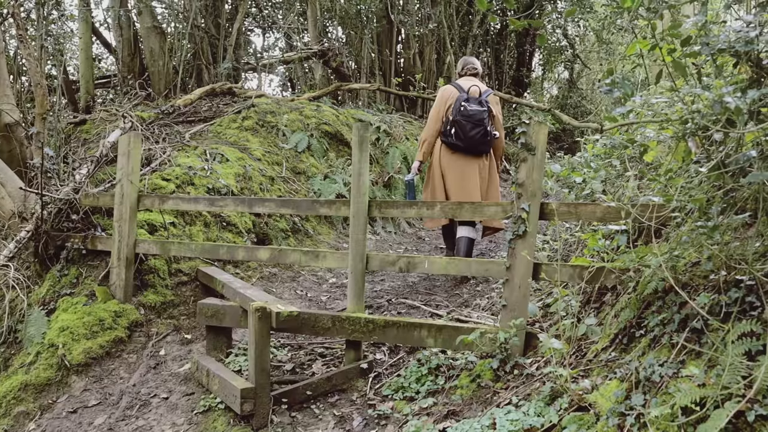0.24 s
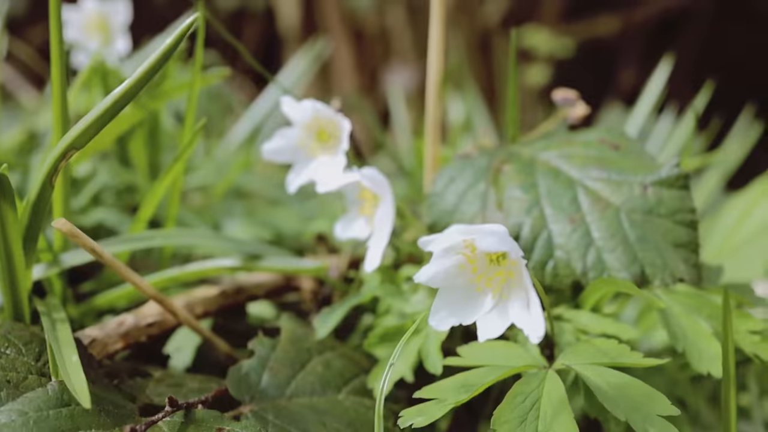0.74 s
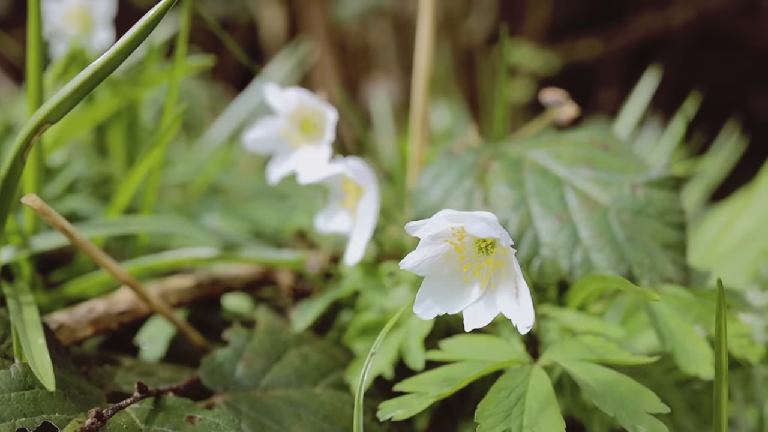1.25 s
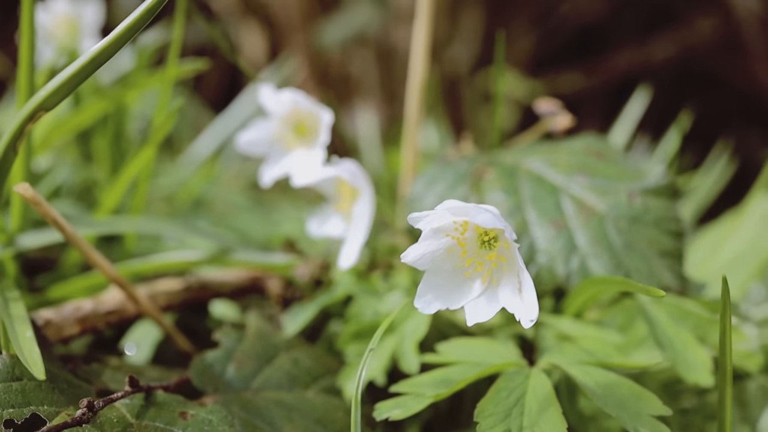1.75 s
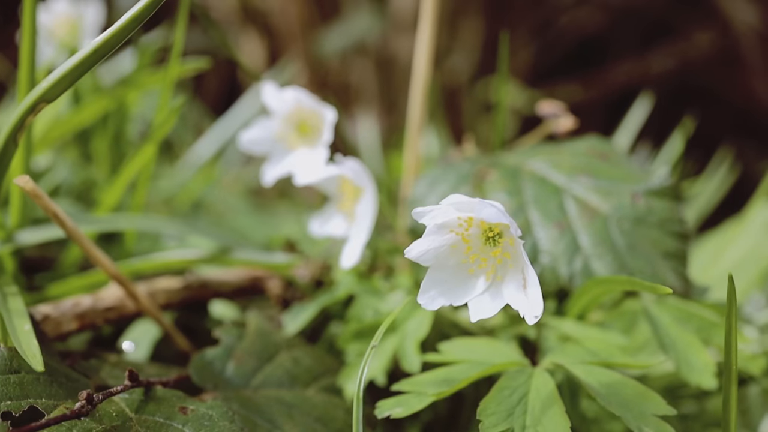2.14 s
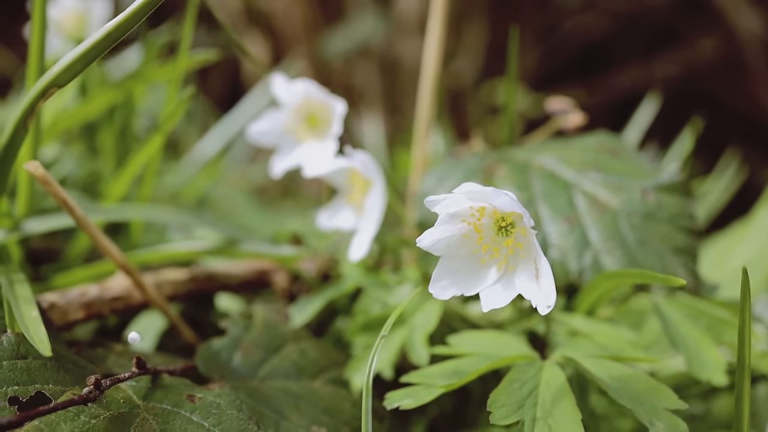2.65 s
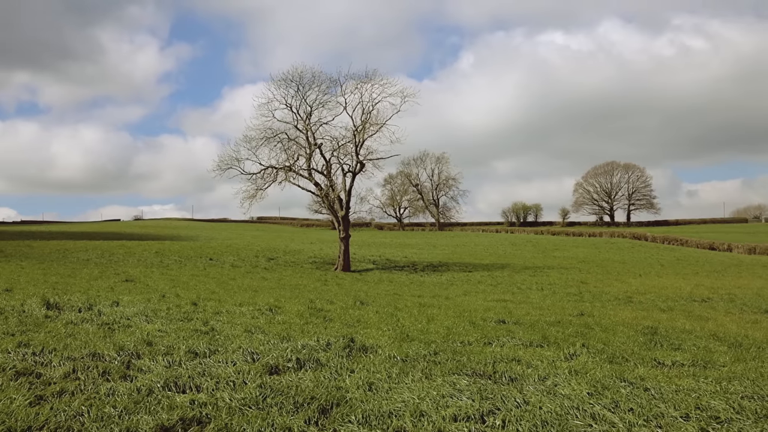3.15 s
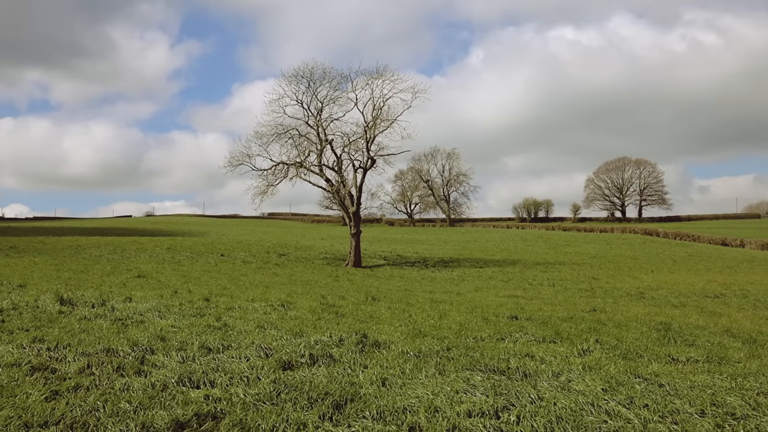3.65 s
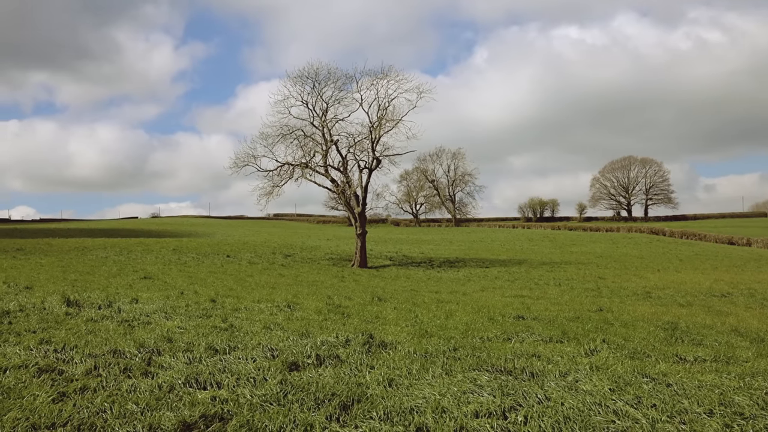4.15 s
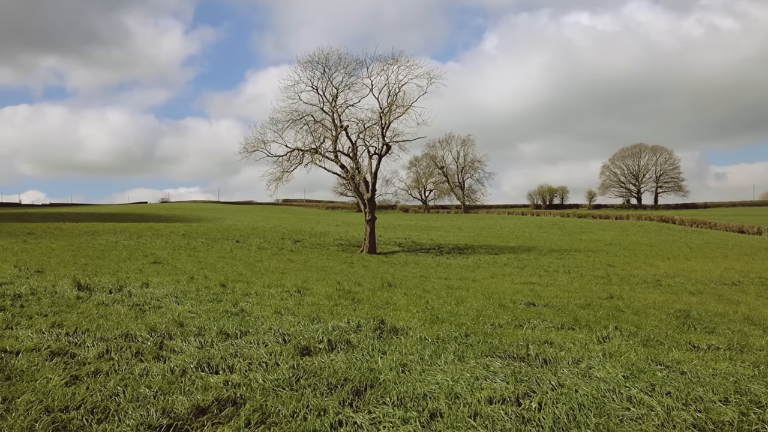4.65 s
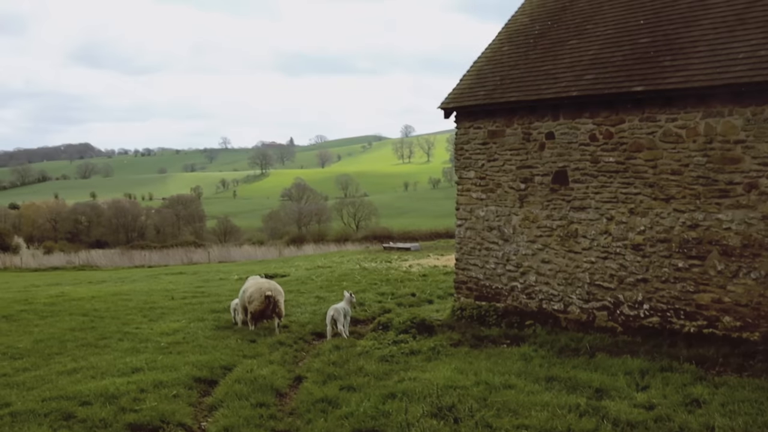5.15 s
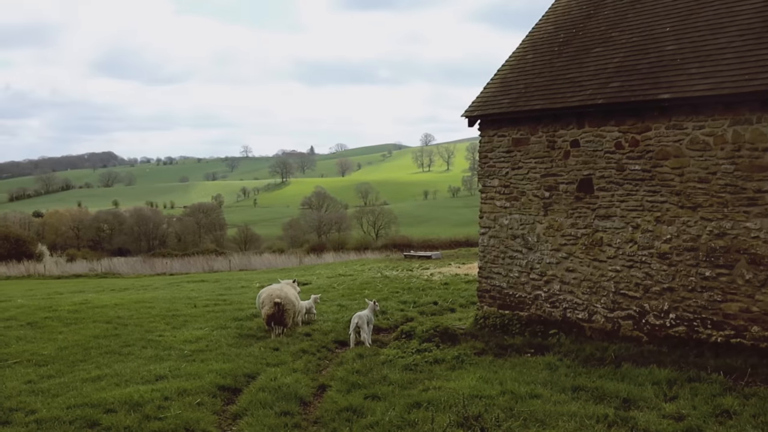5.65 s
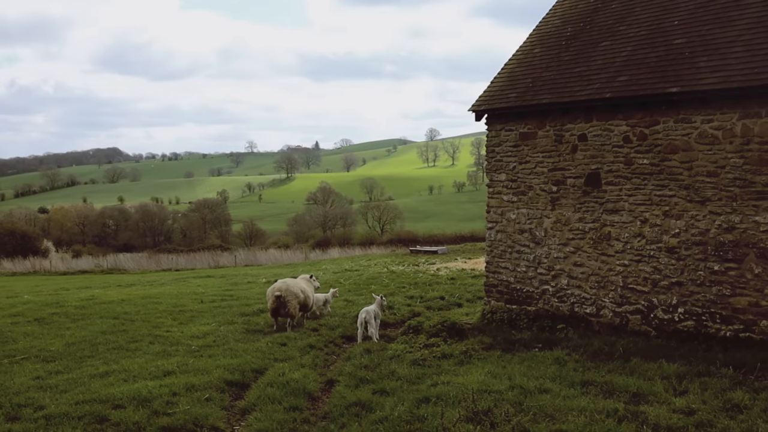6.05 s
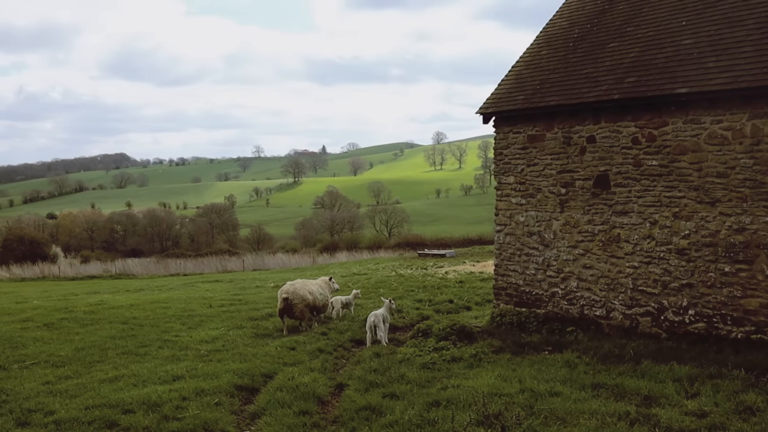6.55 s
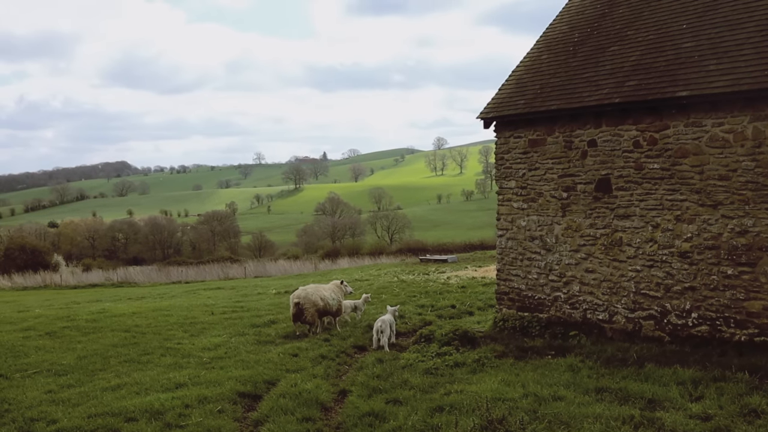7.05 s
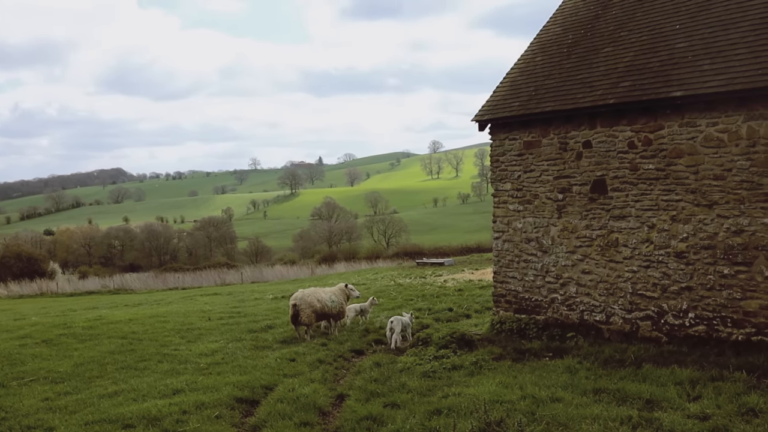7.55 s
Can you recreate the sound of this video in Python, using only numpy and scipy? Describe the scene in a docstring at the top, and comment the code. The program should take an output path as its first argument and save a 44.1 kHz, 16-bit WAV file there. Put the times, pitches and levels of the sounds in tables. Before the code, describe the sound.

A bird whistles over a gritty footstep, leaves rustle and a bird buzzes, wind crosses a field, then a lamb bleats twice around a ewe's low rumble.

```python
"""A small bird whistles and trills over footsteps on a path, the start of a country walk in four places.
Then leaves rustle in a wood, where a bird buzzes; wind crosses a field; at a barn a lamb bleats twice
and a ewe rumbles low in between. Air, leaves and steps are filtered noise, birds are gliding sines,
and the animals are pulses and breath from vocal folds, passed through the resonances of mouth and nose."""
import sys
import numpy as np
from scipy import signal
from scipy.fft import rfft, irfft, next_fast_len
from scipy.io import wavfile
from scipy.ndimage import uniform_filter1d

SR = 44100
rng = np.random.default_rng(int(sys.argv[2]) if len(sys.argv) > 2 else 0)


def persist_wave(psi):
    """Save psi, clipped to +-1, as 16-bit WAV."""
    counts = np.round(np.clip(psi, -1, 1) * 32767).astype(np.int16)
    wavfile.write(sys.argv[1], SR, np.atleast_2d(counts).T)


N = 344421
TIME = np.arange(N) / SR
BINS = np.fft.rfftfreq(4096, 1 / SR)


def amp(db):
    """Decibel law: converts a level to an amplitude gain."""
    return 10 ** (np.asarray(db) / 20)


def unit(x):
    """Normalization: scales a signal to rms 1."""
    return x / np.sqrt(np.mean(x ** 2) + 1e-20)


def curve(rows, t, column=1):
    """Linear interpolation: joins one column of a table by straight lines in time."""
    rows = np.asarray(rows)
    return np.interp(t, rows[:, 0], rows[:, column])


def shape(points, hz):
    """Spectral envelope: gain interpolated in dB along a log-frequency axis."""
    point_hz, db = np.transpose(points)
    return amp(np.interp(np.log(hz + 1), np.log(point_hz + 1), db))


def add(mix, s, sound):
    """Superposition: adds a sound at time s, or at 0 if s is negative."""
    part = mix[max(round(s * SR), 0):][:len(sound)]
    part += sound[:len(part)]


def wander(size, hz):
    """Low-passed random fluctuation of rms 1, up to about hz changes a second."""
    padded = next_fast_len(size)
    f = np.fft.rfftfreq(padded, 1 / SR)
    spectrum = rfft(rng.standard_normal(padded)) / (1 + (f / hz) ** 4)
    return unit(irfft(spectrum, padded)[:size])


def noise(points, patchy_db=1.0, flicker_db=2.3):
    """Subtractive noise: a random spectrum with drifting patches and a flicker shared by all bands."""
    hz = np.fft.rfftfreq(2048, 1 / SR)
    real, imaginary, patches = rng.standard_normal((3, N // 512 + 5, len(hz)))
    patches = uniform_filter1d(patches, size=6, axis=0)  # smooth in time
    patches = unit(uniform_filter1d(patches, size=16, axis=1))  # smooth in frequency
    flicker = rng.standard_normal((len(real), 1))
    level = amp(patchy_db * patches + flicker_db * flicker)
    frames = (real + 1j * imaginary) * shape(points, hz) * level
    return unit(signal.istft(frames.T, nperseg=2048, noverlap=1536)[1][:N])


def tract(x, modes):
    """Minimum-phase resonance: each pulse rings through the modes and dies away after it strikes."""
    gain = sum(amp(db) / (1 + (2 * (BINS - hz) / width) ** 2) for hz, width, db in modes)
    log_gain = np.log(gain + 1e-6)
    circle = np.concatenate([log_gain, log_gain[-2:0:-1]])
    # the Hilbert transform of the log gain supplies the phase of a causal response
    ring = np.fft.ifft(np.exp(np.conj(signal.hilbert(circle)))).real
    return signal.fftconvolve(x, ring)[:len(x)]


def steady(x):
    """Automatic gain: holds a voice near rms 1 over a few cycles."""
    window = signal.windows.hann(600)
    power = np.convolve(x ** 2, window / window.sum(), "same")
    return x / np.sqrt(power + 1e-12)


def echoes(x, t60, wet_db):
    """Reverberation: adds sparse random reflections that decay by 60 dB in t60 seconds."""
    t = np.arange(SR) / SR
    sparse = rng.standard_normal(SR) * (rng.random(SR) < .05)
    taps = sparse * (t > .004) * amp(-60 * t / t60)
    return x + amp(wet_db) * signal.fftconvolve(x, taps / np.linalg.norm(taps))[:N]


# gusts stir the leaves and push on the microphone:
# crest_s, half_length_s, rustle_rise_db, wind_rise_db
GUST_ROWS = [(0.773, 0.12, 1.5, -1), (1.427, 0.048, 0.5, 2), (2.6, 0.17, 1, -5), (3.36, 0.22, 2.5, 1),
             (4.416, 0.22, 4, 3), (4.744, 0.1, 1.5, 8), (4.93, 0.1, 2, 11), (5.294, 0.18, 3.5, 6)]


def gusts():
    """Gaussian envelopes: changes in the level of rustle and wind, in dB."""
    return sum(np.outer(rise_db, np.exp(-((TIME - s) / half) ** 2)) for s, half, *rise_db in GUST_ROWS)


# spectrum of the slow sway of pressure: frequency_hz, level_db
SWAY_SPECTRUM = [(8, -34), (20, 0), (26, 3), (34, -17), (60, -32), (150, -56.5)]
# spectrum of the wind's buffeting: frequency_hz, level_db
BUFFET_SPECTRUM = [(25, -18), (40, -13), (54, 4), (90, 3.5), (150, -7.5), (220, -34.5), (600, -65)]


def wind(sway_db, buffet_db):
    """Turbulent pressure: lumpy low-frequency noise on the microphone."""
    sway = noise(SWAY_SPECTRUM, flicker_db=2.5) * amp(sway_db)
    return sway + noise(BUFFET_SPECTRUM, flicker_db=0.5) * amp(buffet_db)


# course of one gust in the grass: time_s, level_db
GRASS_GUST = [(4.2, -79), (4.38, -53.5), (4.48, -43.5), (4.58, -48), (4.7, -48.5), (4.76, -75)]
# spectrum of the hissing grass: frequency_hz, level_db
GRASS_SPECTRUM = [(1500, -1.5), (3000, -0.5), (6000, -4.5), (8500, -2), (15500, -11.5)]


def grass():
    """Broadband friction noise: one gust hisses across the field."""
    return noise(GRASS_SPECTRUM, patchy_db=2.5, flicker_db=2.5) * amp(curve(GRASS_GUST, TIME))


# dull thuds: crest_s, level_db, centre_hz
THUD_ROWS = [(1.515, -39, 76), (5.3, -47, 178), (5.589, -42.5, 176), (6.41, -48, 178), (6.47, -48, 178),
             (6.73, -52, 178), (6.919, -44.5, 191), (6.971, -53, 180)]


def thuds():
    """Heavily damped resonance: soft low bumps of narrow noise under a Gaussian envelope."""
    out, t = np.zeros(N), np.arange(-.1, .1, 1 / SR)
    for s, db, hz in THUD_ROWS:
        body = unit(tract(rng.standard_normal(len(t)), [(hz, 0.45 * hz, 0)]))
        add(out, s + t[0], amp(db) * np.exp(-(t / 0.021) ** 2) * body)
    return out


# twigs tick: start_s, level_db (each peaks at 2.96 times this amplitude), centre_hz
TWIG_TICKS = [(0.032, -35, 3760), (.887, -50, 9000), (1.481, -34.5, 5900), (1.647, -49, 9000),
              (1.782, -42.5, 7000), (1.881, -44, 6800), (1.949, -49, 9000)]


def twigs():
    """Impulsive excitation: dry snaps of noise a few milliseconds long, each in one broad resonance."""
    out, t = np.zeros(N), np.arange(2048) / SR
    for s, db, hz in TWIG_TICKS:
        snap = tract(rng.standard_normal(len(t)) * np.exp(-t / 0.0019), [(hz, hz * 1.0, 0)])
        add(out, s, amp(db) * 2.96 * snap / abs(snap).max())
    return out


def whistle(length, pitches, db):
    """Frequency modulation: a near sine glides smoothly through two or three pitches."""
    u = np.linspace(0, 1, int(length * SR))
    glide = np.polyfit(np.linspace(0, 1, len(pitches)), pitches, len(pitches) - 1)
    hz = np.polyval(glide, u) * (1 + 0.008 * wander(len(u), 250))
    tone = np.sqrt(2) * np.sin(2 * np.pi * np.cumsum(hz) / SR)
    return amp(db) * signal.windows.tukey(len(u), .7) * tone


# far birds chirp: start_s, start_hz, end_hz, level_db
FAR_CHIRPS = [(4.287, 6300, 4800, -61), (4.348, 5340, 4400, -53), (6.229, 4120, 5000, -57),
              (6.378, 3690, 4300, -56.5), (6.517, 4120, 4850, -59), (6.692, 3800, 4180, -59)]
CHIRP_S = 0.029
RUN_START_S, RUN_PERIOD_S = 6.911, .0495  # one of them runs off four falling notes


def far_birds(count=4):
    """Gliding tones with reverberation: faint single chirps and one even run of falling notes."""
    out = np.zeros(N)
    for s, *pitches, db in FAR_CHIRPS:
        add(out, s, whistle(CHIRP_S, pitches, db))
    for k in range(count):
        add(out, RUN_START_S + k * RUN_PERIOD_S, whistle(CHIRP_S, (3750, 2700), -57))
    return echoes(out, t60=.5, wet_db=-7)


BUZZ_START_S, BUZZ_DB, BUZZ_SWELL_DB_PER_S = 2.566, -55.5, 70
BUZZ_SURGE_HZ, BUZZ_SURGE_DB = 17.5, 3  # the level surges as it swells


def buzz():
    """Fast frequency modulation: a bird's swelling whistle flutters at 130 Hz, so that it buzzes."""
    hz = 4020 + 140 * np.sin(2 * np.pi * 130 * TIME) + 65 * wander(N, 200)
    age = np.clip(TIME, BUZZ_START_S, PLACE_EDGES[2]) - BUZZ_START_S
    surge = BUZZ_SURGE_DB * np.sin(2 * np.pi * BUZZ_SURGE_HZ * age)
    db = BUZZ_DB + BUZZ_SWELL_DB_PER_S * age + surge
    note = np.sqrt(2) * np.sin(2 * np.pi * np.cumsum(hz) / SR) * amp(db) * (age > 0)
    return echoes(note, t60=0.3, wet_db=-2.5)


# a boot presses grit and leaves: start_s, level_db (before a common lift of 1 dB), fading_time_s
STEP_PRESSES = [(0.353, -33.5, 0.014), (0.37, -33.5, 0.01), (0.384, -48.5, 0.072), (0.454, -39, 0.022),
                (0.467, -36, 0.013), (0.474, -31.5, 0.0084), (.494, -42, 0.059), (0.519, -40, 0.0057)]
# spectrum of the crushed grit: frequency_hz, level_db
GRIT_SPECTRUM = [(35, -35), (60, 4.5), (792, -4.5), (1260, -10), (2910, -3.5), (3930, -3), (4630, -9),
                 (5450, -8), (8280, -12), (9510, -9.5), (15500, -20)]


def footsteps():
    """Granular excitation: each press crushes a burst of small grains, a few of them much larger."""
    press = np.zeros(N)
    for s, db, fade in STEP_PRESSES:
        age = np.maximum(TIME - s, 0)
        press += amp(db) * (1 - np.exp(-age / 0.0008)) * np.exp(-age / fade)
    grains = amp(5 * np.minimum(wander(N, 500), 2.2))
    return press * unit(noise(GRIT_SPECTRUM) * grains) * amp(1)


# the near bird's opening slurs: start_s, length_s, start_hz, middle_hz, end_hz, level_db
SLURS = [(-.01, 0.046, 7500, 7450, 7460, -52), (0.031, 0.083, 6050, 5540, 5410, -35),
         (.099, 0.062, 5500, 5310, 5270, -40), (.167, .027, 6300, 6600, 6650, -44),
         (0.182, 0.039, 6500, 5980, 5830, -33.5)]
# its repeated syllable, two flicks up and one down:
# start_in_syllable_s, length_s, start_hz, end_hz, level_db
TRILL_SYLLABLE = [(0, .019, 4330, 5270, -30.5), (.015, .013, 5170, 6400, -34.5),
                  (.04, .034, 7700, 6690, -41)]
TRILL_START_S, TRILL_PERIOD_S = .254, .1468


def near_bird(count=3):
    """Gliding tones with scattering: slurred whistles, then a trill of like syllables among the trees."""
    out = np.zeros(N)
    for s, length, *pitches, db in SLURS:
        add(out, s, whistle(length, pitches, db))
    for k in range(count):
        for s, length, *pitches, db in TRILL_SYLLABLE:
            add(out, TRILL_START_S + k * TRILL_PERIOD_S + s, whistle(length, pitches, db))
    return echoes(out, t60=.6, wet_db=-4.5)


def folds(hz, rough, jitter, rasp):
    """Glottal source: unevenly timed pulses and a puff of air in each cycle; also gives the cycle count."""
    size = len(hz)
    turns = np.cumsum(hz * (1 + jitter * rough * wander(size, 260))) / SR
    pulses = np.zeros(size)
    # the folds never close the same way for long, so the upper harmonics swell and fade on their own
    for k in range(1, 44):
        pulses += amp(min(k / 3, 3) * wander(size, 32)) * np.cos(2 * np.pi * k * turns)
    pulses = unit(pulses) * (1 + .8 * rough * wander(size, 200))
    puffs = unit((.4 + np.exp(-(turns % 1) / .3)) * rng.standard_normal(size))
    return pulses, rasp * rough * puffs, turns


# the ewe's throbs: crest_s, level_db (of the hum; the rasp swells 7 dB lower), pitch_hz
EWE_THROBS = [(6.42, -52.5, 149.3), (6.508, -38.5, 164.4), (6.599, -34, 170.1), (6.697, -34, 166.9),
              (6.79, -36, 164.5), (6.885, -43, 161.4)]
# her low resonances: centre_hz, width_hz, level_db
EWE_LOW_MODES = [(168, 98, -22), (495, 99, 6)]
# her upper resonances: centre_hz, width_hz, level_db
EWE_HIGH_MODES = [(1308, 145, -1), (2114, 240, -2.5), (2570, 210, -3.5), (3580, 460, -21)]


def ewe():
    """Source and filter: short hoarse throbs hum only at each crest, while the rasp lasts longer."""
    t = np.arange(6.3, 7.05, 1 / SR)
    crest = sum(amp(db) * np.exp(-((t - s) / 0.013) ** 2) for s, db, _ in EWE_THROBS)
    swell = sum(amp(db - 7.0) / (1 + ((t - s) / 0.021) ** 4) for s, db, _ in EWE_THROBS)
    pulses, air, _ = folds(curve(EWE_THROBS, t, column=2), .5, jitter=.08, rasp=1.2)
    hum = crest * steady(tract(pulses + air, EWE_LOW_MODES))
    rasp = swell * steady(tract(pulses + air, EWE_HIGH_MODES))
    out = np.zeros(N)
    add(out, t[0], hum + rasp)
    return echoes(out, t60=.3, wet_db=-11)


# the lamb's voice comes in throbs, each lasting until the next:
# start_s, pitch_lift_hz, mouth_opening_db, nasal_rise_db
LAMB_THROBS = [(5.325, 28.4, 3, 13), (5.411, 44, 4, 9.5), (5.483, 55.3, 12.5, 12), (5.561, 56, 13.5, 16),
               (5.641, 62, 14.5, 15), (5.72, 62.5, 13.5, 12.5), (5.801, 44, 10.5, 9.5),
               (5.885, 30.7, 8, 11), (5.961, 25.8, 9, 5), (6.045, 20.2, 8.5, 0.5), (7.106, 26.3, 12, 5),
               (7.174, 44.7, 14, 4.5), (7.247, 45, 21, 3), (7.315, 29.5, 18, 4), (7.392, 32, 19, 2),
               (7.563, 36.5, 16.5, 1), (7.636, 11, 1.5, -2), (7.7, 25.2, 11, 1.5), (7.779, 10.6, 9.5, 0)]
CREST_SHARE = .68  # how far into a throb it peaks
DROP_S = .028  # longest collapse after the crest


def quaver(t, last_s, broad):
    """Amplitude and pitch modulation: height (0-1) of each throb, time past its crest, its strengths."""
    rows = np.array(sorted(row for row in LAMB_THROBS if t[0] - .05 < row[0] < last_s))
    starts = rows[:, 0]
    crests = starts + CREST_SHARE * np.diff(starts, append=last_s)
    which = np.maximum(np.searchsorted(starts, t) - 1, 0)
    past = t - crests[which]
    rise = np.sin(np.pi / 2 * np.clip(1 + past / (crests - starts)[which], 0, 1)) ** broad
    room_s = np.minimum(DROP_S, np.append(starts[1:], last_s) - crests)[which]
    drop = np.cos(np.pi / 2 * np.clip(past / room_s, 0, 1)) ** 2
    return rise * drop, past, rows[which, 1:].T


# air forced past the folds: centre_hz, width_hz, level_db
RASP_MODES = [(5870, 2000, 2), (8470, 1100, -1), (9750, 950, -4), (11600, 1200, -14)]
CHEST_DB_PER_HZ = 0.2192  # the fundamental swells as a throb lifts the pitch
ATTACK_DB, RELEASE_DB, RELEASE_S = 38, 32.5, 0.1  # climb at the start of a bleat, fall at its end
RUSH_FADE_DB_PER_S = 20  # fading of the hiss of air, besides that of the whole bleat
# roughness 0-1 of a bleat, and how fast it clears
HOARSE_START, HOARSE_HELD, HOARSE_END, CLEARING_S = .26, .06, .35, .17
CATCH, CATCH_S = .24, .013  # roughness of the catch just after each crest, and its half length
WOBBLE, WOBBLE_HZ = .008, 55  # unsteadiness of the pitch: rms share, rate


def bleat(start, end, pitch, chest, mouth_modes, nose_modes, attack_s, low_hz, mouth_db, nose_db, rush_db,
          fade_db_per_s, broad, squareness):
    """Source and filter: a voice through mouth and nose, louder as pitch lifts, catching as it drops."""
    t = np.arange(start, end, 1 / SR)
    age = t - start
    height, past, (lift_hz, open_db, ring_db) = quaver(t, end - RELEASE_S, broad)
    hz = (curve(pitch, t) + height * lift_hz) * (1 + WOBBLE * wander(len(t), WOBBLE_HZ))
    # loudness switches more abruptly than pitch
    push = .5 + .5 * np.tanh(squareness * (2 * height - 1)) / np.tanh(squareness)
    closing = np.clip(1 - (end - t) / RELEASE_S, 0, 1)
    attack = -ATTACK_DB * np.clip(1 - age / attack_s, 0, 1)
    effort = attack - fade_db_per_s * age - RELEASE_DB * closing
    # hoarsest as the voice breaks out, then clearing
    breaking = np.minimum(age / attack_s, np.exp((attack_s - age) / CLEARING_S))
    catch = CATCH * np.exp(-(past / CATCH_S - 1) ** 2)
    rough = HOARSE_HELD + HOARSE_START * breaking + HOARSE_END * closing + catch
    pulses, air, turns = folds(hz, rough, jitter=.055, rasp=.75)
    # the small mouth radiates little below its first resonance
    low_cut = signal.butter(4, low_hz, "high", fs=SR, output="sos")
    mouth = signal.sosfilt(low_cut, tract(pulses + .3 * air, mouth_modes))
    mouth = steady(mouth) * amp(mouth_db + push * open_db)
    nose = steady(tract(pulses + air, nose_modes)) * amp(nose_db + push * ring_db)
    rush_level = rush_db - RUSH_FADE_DB_PER_S * age + 2.2 * wander(len(t), 49)
    rush = steady(tract(air, RASP_MODES)) * amp(rush_level)
    chest_level = curve(chest, t) + CHEST_DB_PER_HZ * height * lift_hz
    fundamental = np.sqrt(2) * np.cos(2 * np.pi * turns) * amp(chest_level)
    voice = amp(effort) * (mouth + nose + rush) + fundamental
    return start, voice * signal.windows.tukey(len(t), .01)


# the pitch that the throbs rise from, in each bleat: time_s, pitch_hz
PITCH_1 = [(5.31, 286.7), (5.49, 288), (5.56, 306.8), (5.699, 303.9), (5.801, 294.5), (5.889, 308.8),
           (6.11, 283.3), (6.199, 249)]
PITCH_2 = [(7.099, 300), (7.174, 303.7), (7.21, 348.6), (7.43, 362.6), (7.56, 355.6), (7.82, 352.6)]
# level of the fundamental under the throbs: time_s, level_db
CHEST_1 = [(5.31, -61), (5.35, -45.5), (5.39, -57.5), (5.7, -58), (6.15, -52.5), (6.19, -72)]
CHEST_2 = [(7.1, -65), (7.13, -44), (7.175, -56), (7.23, -45.5), (7.45, -39.5), (7.61, -44), (7.645, -61),
           (7.8, -48.5)]
# resonances of the lamb's mouth and nose in each bleat: centre_hz, width_hz, level_db
MOUTH_1 = [(680, 270, -10), (1095, 210, -1), (1254, 110, 2.5), (1445, 260, 2)]
NOSE_1 = [(1870, 300, -8.5), (2185, 280, -4.5), (2460, 260, -11.5), (2892, 96, 4.5), (3170, 270, -8),
          (3680, 570, -2), (3927, 200, 4), (4770, 390, -5.5), (5800, 2100, -28), (8400, 380, -21.5),
          (9340, 310, -20.5), (10330, 400, -28)]
MOUTH_2 = [(750, 97, -14), (1166, 114, 2.5), (1466, 140, -7)]
NOSE_2 = [(1554, 100, -5.5), (1895, 190, -6.5), (2250, 140, -2.5), (2750, 230, -9), (2934, 360, 5.5),
          (3834, 480, 3.5), (4460, 200, -13), (4820, 570, -5.5), (5800, 900, -25), (8350, 470, -32),
          (9400, 610, -32), (10340, 500, -26), (14300, 500, -41), (15550, 500, -37)]


def lamb():
    """Discrete reflection and reverberation: two bleats, thrown back by the ground and the stone walls."""
    voice = np.zeros(N)
    add(voice, *bleat(5.31, 6.2, PITCH_1, CHEST_1, MOUTH_1, NOSE_1, attack_s=0.11, low_hz=894,
                      mouth_db=-40.5, nose_db=-33.0, rush_db=-40.5, fade_db_per_s=-0.15,
                      broad=0.96, squareness=1.04))
    add(voice, *bleat(7.1, 7.92, PITCH_2, CHEST_2, MOUTH_2, NOSE_2, attack_s=.12, low_hz=630,
                      mouth_db=-38, nose_db=-21.5, rush_db=-34.0, fade_db_per_s=1.0,
                      broad=1.3, squareness=0.42))
    out = voice.copy()
    for delay, gain in [(.0029, .15), (.0113, .17)]:
        add(out, delay, gain * voice)
    return echoes(out, t60=.2, wet_db=-15)


# boundaries of path, wood, field and barn: time_s
PLACE_EDGES = [0, .565, 2.752, 4.988, 7.82]
# spectrum of the air in each place, one list per place: frequency_hz, level_db
AIR_SPECTRA = [
    [(88, -36), (150, -4.5), (894, -9.5), (2650, -16.5), (3980, -10), (4480, -19), (5440, -8), (6730, -22),
     (15500, -26.5)],
    [(88, -37), (150, -12), (193, 1.5), (436, -2), (583, -4), (656, -5.5), (860, -0.5), (1220, -2),
     (1730, -1.5), (5230, -7), (6730, -14), (9180, -15), (15500, -24)],
    [(88, -31), (150, -2), (268, -2), (373, -7), (656, -6.5), (1220, -9), (1540, -9.5), (2100, -13),
     (2980, -14), (3280, -15), (15500, -25.5)],
    [(88, -54), (150, -1.5), (248, -6), (428, -11.5), (540, -14.5), (618, -17), (656, -11.5), (722, -14.5),
     (796, -14.5), (1200, -15), (15500, -30)],
]
# air in each place before the gusts: rustle_db, sway_db, buffeting_db
CALM_LEVELS = [(-49.5, -57.5, -59.5), (-47.5, -44, -57.5), (-48, -40.5, -50), (-54.5, -45.5, -59)]


def places():
    """Time gating: each place has its own rustle, wind and animals, and gives way at once to the next."""
    sounds = [footsteps() + near_bird(), buzz(), grass(), lamb() + ewe()]
    stir_db, push_db = gusts()
    out = np.zeros(N)
    rows = zip(PLACE_EDGES, PLACE_EDGES[1:], AIR_SPECTRA, CALM_LEVELS, sounds)
    for start, end, air, (rustle_db, sway_db, buffet_db), sound in rows:
        here = (TIME >= start) & (TIME < end)
        rustle = noise(air, patchy_db=1.4, flicker_db=1.27) * amp(rustle_db + stir_db)
        out += here * (rustle + wind(sway_db, buffet_db) * amp(push_db) + sound)
    return out


def scene():
    """Superposition: all sources add at one microphone."""
    return (places() + far_birds() + twigs() + thuds())[None]


def record(dry):
    """Low-pass filtering: limits the band to 15.8 kHz."""
    low_pass = signal.firwin(511, 15800, window=("kaiser", 9), fs=SR)
    return signal.oaconvolve(dry, low_pass[None], "same")


dry = scene()
out = record(dry)
persist_wave(out)
```